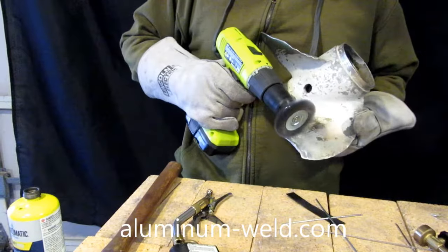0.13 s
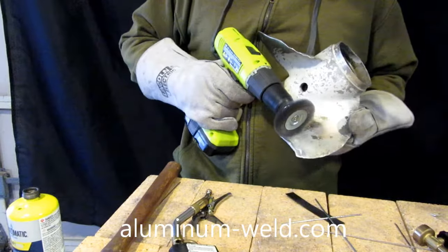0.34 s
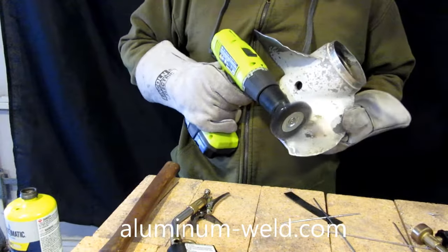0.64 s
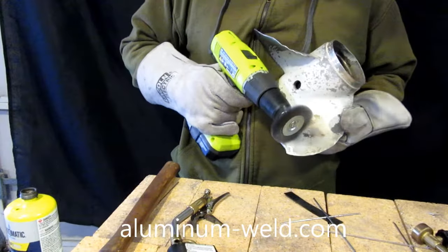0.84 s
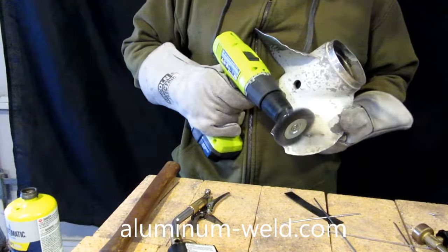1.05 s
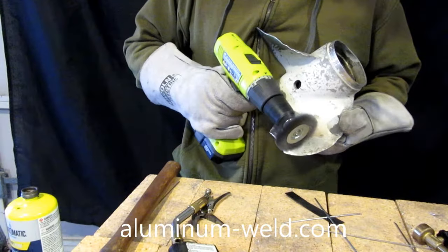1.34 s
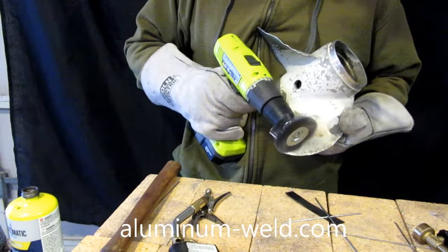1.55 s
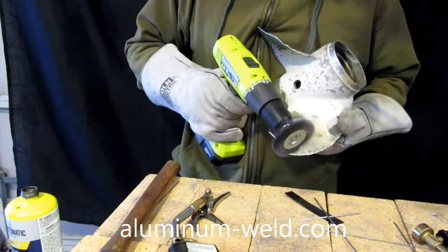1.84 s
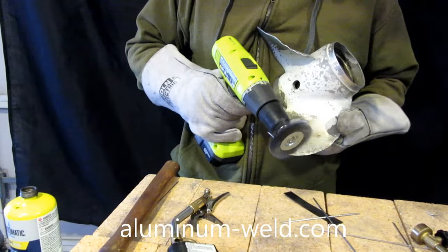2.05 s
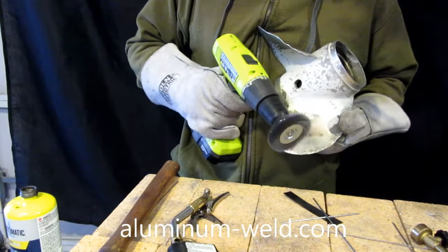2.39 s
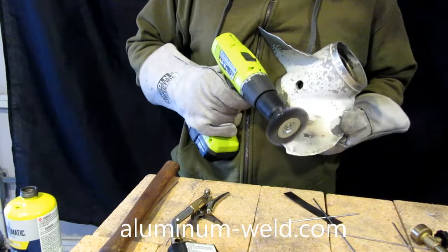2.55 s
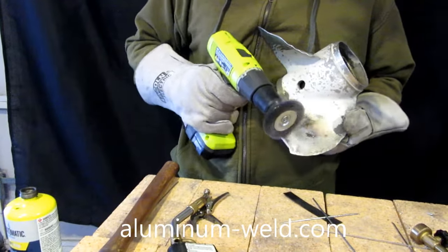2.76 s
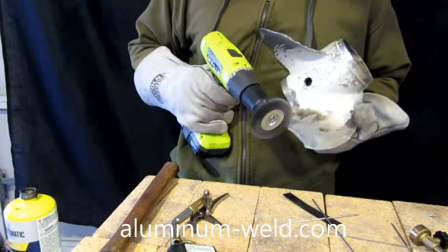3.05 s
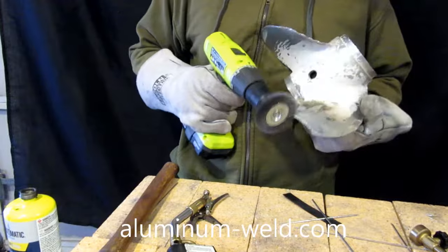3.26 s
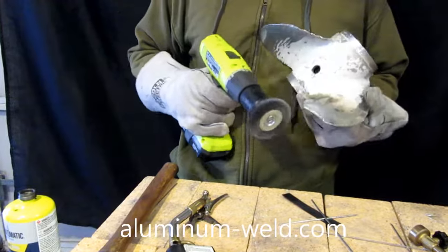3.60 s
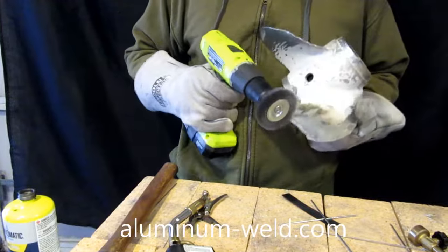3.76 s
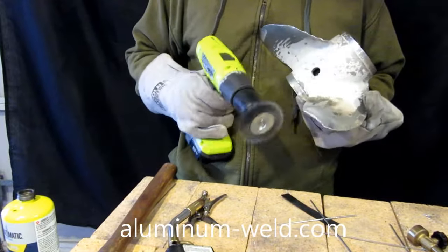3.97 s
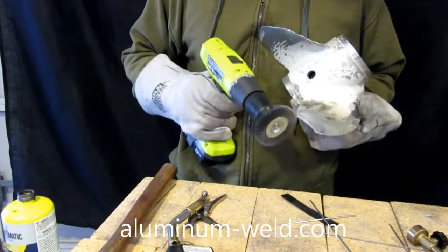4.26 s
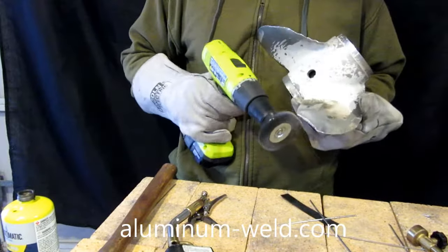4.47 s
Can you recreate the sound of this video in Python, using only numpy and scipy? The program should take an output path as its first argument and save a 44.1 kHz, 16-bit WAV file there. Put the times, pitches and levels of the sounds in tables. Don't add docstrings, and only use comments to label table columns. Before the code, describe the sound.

From the start a cordless drill is already running close to the microphone: a gear whine around 1700 Hz, wavering slightly, over rough motor hiss. Its wire wheel scours a hollow aluminum casting with a dense, steely rasp, bright and sizzling, with metallic ringing that changes as the wheel moves from face to rim and neck. A low hum shudders in the grip. Near 2.9 s the pitch sags under load; at about 3.05 s the wheel lifts and the whine rises. The trigger is released around 3.25 s and the pitch slides down toward half, with short rim scrapes at 3.25, 3.35, 3.7 and 3.8 s. From 3.75 s a short, lower-pitched rev arches upward. At 4.16 s a hard, dry metal knock cracks loudly, and the sound ducks briefly. A second quick rev peaks near 4.4 s, with a light catch at 4.3 s, then falls. Small, short-sounding workshop, centred.

```python
import sys
import numpy as np
from scipy import signal
from scipy.fft import rfft, irfft
from scipy.io import wavfile
from scipy.ndimage import uniform_filter1d

SR = 44100
rng = np.random.default_rng(int(sys.argv[2]) if len(sys.argv) > 2 else 0)


def file_out(sig):
    cols = np.atleast_2d(sig).T
    lim = np.clip(cols, -1, 1)
    pcm = np.round(lim * 32767).astype(np.int16)
    wavfile.write(sys.argv[1], SR, pcm)


def ratio(d):
    e = np.asarray(d, float) / 20
    return 10 ** e


N = 204403

MESH_TEETH = 72
CARRIER_ORDER, STAGE_ORDER = 30, 112
TREMOR_HZ, TREMOR_TOP_S = 6.7, 0.021

# t/s, pressure/dB, place (0 edge of face, 1 mid face, 2 rim, 3 neck),
# bowl freed by the glove/dB
LONG_PASS = [(0, -17, .6, -9), (.15, -17.5, .1, -1), (.35, -19, .1, 0.5), (.8, -19, .55, -2),
             (1.05, -18, .2, 0), (1.2, -17.5, .5, 5), (1.45, -17, .5, -2), (1.75, -16.5, .9, 2),
             (1.92, -18.5, 1, 2), (2.15, -16.5, 1.15, 3), (2.36, -15.5, 1.3, -3), (2.53, -15, 1.4, 4),
             (2.64, -19, 1.1, 1), (2.83, -15.5, 1.85, 2), (3.03, -17, 1.89, 1)]
# t/s, peak/dB, f/Hz
SNAGS = [
    (4.1642, -2.5, 2700),
    (4.289, -17, 2750),
]


def rms_one(x):
    return x / np.sqrt(np.mean(x ** 2) + 1e-20)


def in_time(rows):
    s, *columns = np.transpose(rows)
    return [np.interp(np.arange(N) / SR, s, c) for c in columns]


def drift(rate):
    r = np.exp(-80 * np.pi * rate / SR)
    noise = rng.standard_normal(N // 40 + 2002)
    slow = signal.lfilter([1], [1, -2 * r, r * r], noise)[2000:]
    return np.interp(np.arange(N) / 40, np.arange(len(slow)), rms_one(slow - slow.mean()))


def colour(x, spectrum):
    hz = np.maximum(np.fft.rfftfreq(N, 1 / SR), 1)
    points = np.array(spectrum)
    gain_db = np.interp(np.log(hz), np.log(points[:, 0]), points[:, 1])
    return rms_one(irfft(rfft(x) * ratio(gain_db), N))


def resonate(x, hz, width_hz):
    r = np.exp(-np.pi * width_hz / SR)
    zeros = np.array([1, 0, -1]) * (1 - r * r) / 2
    return signal.lfilter(zeros, [1, -2 * r * np.cos(2 * np.pi * hz / SR), r * r], x)


def by_place(place, levels_db):
    return np.interp(place, np.arange(len(levels_db)), levels_db)


def workshop(x):
    t60_s, gap_s = 0.16, .006
    t = np.arange(SR // 2) / SR
    tail = rng.standard_normal(len(t)) * ratio(-60 * t / t60_s) * (t > gap_s)
    tail = signal.lfilter([.4], [1, -.6], tail)
    return signal.fftconvolve(x, tail / np.sqrt(np.sum(tail ** 2)))[:N]


def grip(pressure_db, place):
    # f/Hz, width/Hz, level/dB
    grip_modes = [(80, 34, -12), (151, 34, -3), (218.8, 16.7, 3), (293, 26, -3)]
    idle_db, lag_s = -71, .06
    shake = rng.standard_normal(N)
    hum = 0
    for hz, width, level_db in grip_modes:
        hum = hum + ratio(level_db) * resonate(resonate(shake, hz, width), hz, 4 * width)
    push = ratio(pressure_db + by_place(place, [-32.5, -29, -41, -26]))
    push = uniform_filter1d(push, int(lag_s * SR))
    return (ratio(idle_db) + push) * rms_one(hum)


def motor(turns, motor_db):
    # f/Hz, level/dB per Hz
    hiss = [(40, -29), (150, -21.5), (420, -15), (650, -2.5), (1100, -6.5), (2200, 0.5), (3500, -3.5),
            (6800, -4.5), (7200, -15), (9300, -10.5), (11400, -13.5), (12200, -20), (15300, -35)]
    housing_hz = [310, 620, 760, 2250, 2790, 4000, 5400, 6600, 9100]
    # width/Hz, level/dB
    housing = [(20, -8), (210, -15), (100, -25.5), (130, -38), (146, -3.5), (460, 5.5), (254, -9), (345, 5),
               (400, -9)]
    sparks = rng.standard_normal(N) * ratio(1.5 * rng.standard_normal(N))
    beat = 1 + 0.11 * np.cos(2 * np.pi * 4 * turns) + 0.17 * np.cos(2 * np.pi * 21.0 * turns)
    air = sparks * beat * ratio(0.61 * drift(16))
    shell = 0
    for k, (hz, (width, level_db)) in enumerate(zip(housing_hz, housing)):
        shell = shell + (-1) ** k * ratio(level_db) * resonate(air, hz, width)
    return ratio(motor_db) * rms_one(colour(air, hiss) + ratio(-0.5) * rms_one(shell))


def mesh_pitch():
    # t/s, output mesh f/Hz, mesh level/dB
    long_pull = [(0, 1795, -26), (.07, 1745, -22), (.2, 1697, -21), (.38, 1700, -23), (.46, 1680, -22),
                 (.9, 1706, -22), (1.18, 1662, -25), (1.5, 1690, -29), (1.75, 1664, -29), (2.12, 1695, -28),
                 (2.28, 1672, -28), (2.45, 1690, -27), (2.64, 1672, -24), (2.93, 1555, -29),
                 (3.02, 1600, -25), (3.18, 1815, -29), (3.265, 1750, -25)]
    # start t/s, top t/s, top f/Hz, arch/Hz per s squared, mesh level/dB
    short_pulls = [
        (3.75, 4.17, 1436, 3345, -35),
        (4.19, 4.378, 1493, 6200, -34.5),
    ]
    coast_hz, coast_s, inertia_s = 870, .12, .05
    tremor_sag_hz, tremor_lag_s = 3, .03
    coast_fade_hz = 125
    fade_db_per_hz = .02
    t = np.arange(N) / SR
    hz, level_db = in_time(long_pull)
    release_s, release_hz, _ = long_pull[-1]
    since = np.maximum(t - release_s, 0)
    hz = uniform_filter1d(hz, int(inertia_s * SR), mode="nearest")
    bounce = np.cos(2 * np.pi * TREMOR_HZ * (t - TREMOR_TOP_S - tremor_lag_s))
    hz = hz - tremor_sag_hz * bounce * (t < LONG_PASS[-1][0])
    hz = np.where(since > 0, coast_hz + (hz - coast_hz) * np.exp(-since / coast_s), hz)
    level_db = level_db - (since > 0) * ((release_hz - hz) / coast_fade_hz) ** 2
    for s, top_s, top_hz, arch, top_db in short_pulls:
        drop = arch * (t - top_s) ** 2
        hz = np.where(t > s, top_hz - drop, hz)
        level_db = np.where(t > s, top_db - fade_db_per_hz * drop, level_db)
    return (uniform_filter1d(hz, size=400, mode="nearest"),
            uniform_filter1d(level_db, size=400, mode="nearest"))


def whine(turns, motor_db, mesh_hz, mesh_db):
    gear_orders = [15, 180, 147, 168, 172, 210, 220, 228, 240, 269, 224, 448]
    # level under load/dB, level running free/dB
    gear_db = [(-42, -31), (-36, -17), (-27, -17), (-13.5, -17), (-12, -24), (-23, -20), (-12.5, -26),
               (-12, -28), (-14, -26), (-16.5, -16), (-32, -15), (-38, -19.5)]
    # t/s, level lost by the faint lines as the teeth unload/dB
    trigger = [
        (3.25, 0),
        (3.34, -25),
        (3.86, -25),
        (3.95, 0),
        (4.5, 0),
        (4.63, -8),
    ]
    unloaded_db, = in_time(trigger)
    free = np.interp(np.arange(N) / SR, [3.0, 3.3], [0, 1])
    carrier_hz = mesh_hz * CARRIER_ORDER / MESH_TEETH
    stage_hz = mesh_hz * STAGE_ORDER / MESH_TEETH
    carrier_load_db = -38 - .2 * np.abs(carrier_hz - 703)
    carrier_free_db = -34 - .4 * np.abs(carrier_hz - 618)
    carrier_db = carrier_load_db + free * (carrier_free_db - carrier_load_db) + unloaded_db
    stage_load_db = -38
    stage_free_db = -32 - .04 * np.abs(stage_hz - 2290)
    stage_db = stage_load_db + free * (stage_free_db - stage_load_db) + unloaded_db
    out = 0
    for order, level_db in ((MESH_TEETH, mesh_db), (CARRIER_ORDER, carrier_db), (STAGE_ORDER, stage_db)):
        level = ratio(level_db + .9 * drift(16))
        out = out + level * np.sin(2 * np.pi * order * turns + .3 * drift(25))
    for order, (load_db, free_db) in zip(gear_orders, gear_db):
        level_db = motor_db + unloaded_db + load_db + free * (free_db - load_db)
        level = ratio(level_db + 1.6 * drift(12))
        out = out + level * np.sin(2 * np.pi * order * (turns + .0006 * drift(40)))
    return np.sqrt(2) * out


def snags():
    out, t = np.zeros(N), np.arange(1500) / SR
    for s, peak_db, hz in SNAGS:
        knock = np.sin(2 * np.pi * hz * t) * np.exp(-t / .0009)
        thud = 0.15 * np.cos(2 * np.pi * 700 * t) * np.exp(-t / 0.0024)
        crack = 0.64 * rng.standard_normal(len(t)) * np.exp(-t / 0.00079)
        out[round(s * SR):][:len(t)] += ratio(peak_db) * (knock + thud + crack)
    return signal.sosfilt(signal.butter(2, [450, 9000], "band", fs=SR, output="sos"), out)


def touching():
    # start t/s, length/s, pressure at start/dB, pressure at end/dB, place
    grazes = [
        (3.257, .032, -24.5, -14.5, 2.1),
        (3.352, .048, -21.5, -19.5, 2),
        (3.693, 0.048, -20.5, -23, 2.6),
        (3.8, .093, -17, -18.5, 2),
        (4.15, .017, -13.5, -14.5, 2.37),
    ]
    lift_s, lift_db, glove_closed_db = 0.086, -33, -7
    touch_s, touch_db, leave_s, leave_db, trail_s, trail_db = .018, -12, .013, -9, .03, -17
    tremor_db = 0.44
    end_s, _, end_place, _ = LONG_PASS[-1]
    lift = [(end_s + later, db, end_place, glove_closed_db)
            for later, db in ((.025, lift_db + 9), (lift_s, lift_db), (lift_s + .03, -70))]
    pressure_db, place, glove_db = in_time(LONG_PASS + lift)
    pressure, t = ratio(pressure_db), np.arange(N) / SR
    for s, length, start_db, end_db, spot in grazes:
        shape = [(-2 * touch_s, -60), (-touch_s, start_db + touch_db), (0, start_db), (length, end_db),
                 (length + leave_s, end_db + leave_db), (length + trail_s, end_db + trail_db),
                 (length + 2 * trail_s, -60)]
        graze_db, = in_time([(s + later, db) for later, db in shape])
        pressure = pressure + ratio(graze_db)
        place = np.where(t > s - touch_s, spot, place)
    bounce_db = tremor_db * np.cos(2 * np.pi * TREMOR_HZ * (t - TREMOR_TOP_S))
    return 20 * np.log10(pressure) + bounce_db, place, glove_db


def brush(turns, pressure_db, place, glove_db):
    # f/Hz, level/dB per Hz
    wires = [(100, -40), (420, -30), (700, -14), (1200, -5.5), (2000, -2.5), (4300, -2.5), (6800, -4.5),
             (7300, -11), (9500, -10.5), (11500, -15.5), (13000, -22), (15300, -31)]
    # f/Hz, width/Hz, level/dB
    bowl_modes = [(988.4, 18, 4), (1027, 28, -6)]
    # f/Hz, width/Hz, level/dB
    lip_modes = [(1983, 30, 0)]
    casting_hz = [620, 890, 2200, 2490, 2660, 2815, 3050, 3330, 3500, 3950, 4225, 4450, 4860, 5350, 6330,
                  6680, 8000, 9100, 10450, 11000, 12100, 13900]
    # width/Hz, level at edge of face/dB, mid face/dB, rim/dB, neck/dB
    casting = [(29.5, -9, -13.5, -13, -3), (54, -31, -24, -15, -4), (250, -22, -14, -44, -10),
               (130, -21, -4.5, -19, 8), (180, -7, -12.5, -9.5, -2), (70, -7, -27, 1.5, 4),
               (111.11, -8, -37, -13, 0), (260, -12, -42, -12, -3), (170, -11, -13, -14, -3),
               (196, -3.5, -4.5, -12, -1.5), (170, -23, -4.5, -10.5, -27), (99, -13, -38, -5, -5),
               (138.89, -13, -23, -4.5, -21), (219, -23, -23, -12, -9), (138.89, -21, -25, -7.5, -13),
               (198, -24, -4.5, -8.5, -14), (234, -20, -30, -8, -18), (250, -20, -33, -14.5, -24),
               (302, -36, -39, -17.5, -17), (250, -34, -19, -17, -12), (180, -43, -40, -25, -34),
               (250, -30, -24, -26, -29)]
    taps_per_s = 9000
    bowl_db = by_place(place, [-10.5, -5, -14, -17])
    lip_db = by_place(place, [-12, -20, -6, -20])
    sizzle_db = by_place(place, [2, 2, 1.5, 2])
    sizes = ratio(3.4 * np.minimum(rng.exponential(1, N), 4)) * rng.choice([-1, 1], N)
    wobble = (1 + 0.021 * np.cos(2 * np.pi * turns) + 0.074 * np.cos(4 * np.pi * turns)
              + 0.043 * np.cos(8 * np.pi * turns))
    taps = rms_one(sizes * (rng.random(N) < taps_per_s / SR))
    taps = taps * wobble * ratio(.4 * drift(14) + .9 * drift(60))
    pressure = ratio(pressure_db)
    force = taps * pressure
    scratch = colour(taps, wires) * pressure * ratio(-3.4 - 2.5 * np.maximum(place - 1, 0))
    for k, (hz, (width, *levels_db)) in enumerate(zip(casting_hz, casting)):
        answer_db = by_place(place, levels_db) + .8 * drift(7)
        scratch += (-1) ** k * resonate(force * ratio(15.5 + answer_db), hz, width)
    top = signal.sosfilt(signal.butter(2, 7500, "high", fs=SR, output="sos"), scratch)
    scratch += top * (ratio(sizzle_db) - 1)
    for modes, level_db in ((bowl_modes, bowl_db + glove_db + 16), (lip_modes, lip_db + 25.5)):
        for hz, width, mode_db in modes:
            scratch += resonate(force * ratio(level_db + mode_db), hz, width)
    return signal.sosfilt(signal.butter(3, 420, "high", fs=SR, output="sos"), scratch)


def scene():
    mesh_hz, mesh_db = mesh_pitch()
    turns = np.cumsum(mesh_hz / MESH_TEETH) / SR
    motor_db = -22.7 + 1.11 * 20 * np.log10(mesh_hz / 1690)
    pressure_db, place, glove_db = touching()
    drill = whine(turns, motor_db, mesh_hz, mesh_db) + motor(turns, motor_db)
    contact = brush(turns, pressure_db, place, glove_db) + grip(pressure_db, place) + snags()
    near = drill + contact
    room_db = -19.5
    heard = near + ratio(room_db) * workshop(near)
    return np.array([heard, heard])


def low_pass(x):
    return signal.sosfilt(signal.butter(12, 15250, fs=SR, output="sos"), x)


def record(dry):
    duck_db, delay_s, recover_s = -7, 0.018, 0.21
    since = np.arange(N) / SR - SNAGS[0][0]
    recovery = np.exp(-np.maximum(since - delay_s, 0) / recover_s)
    gain_db = duck_db * np.clip(since / delay_s, 0, 1) * recovery
    return low_pass(np.clip(dry * ratio(gain_db), -1, 1))


dry = scene()
out = record(dry)
file_out(out)
```